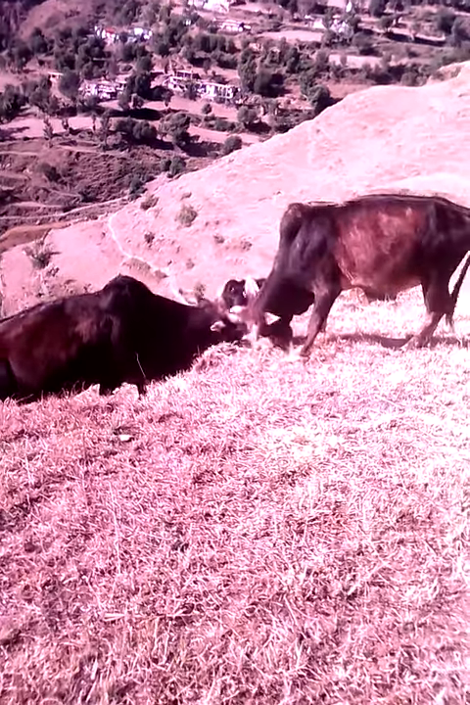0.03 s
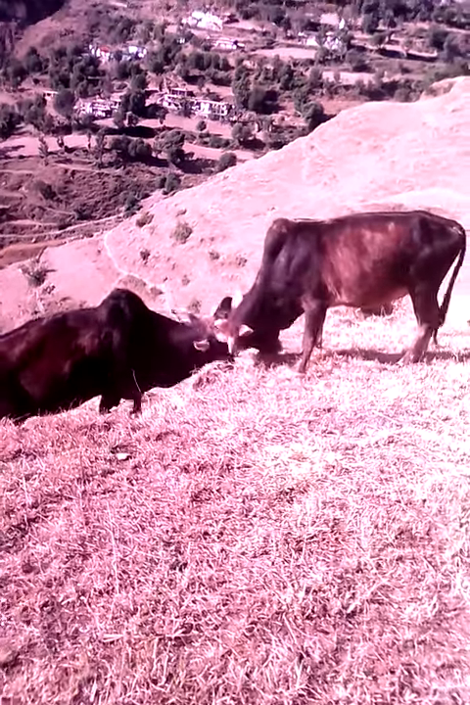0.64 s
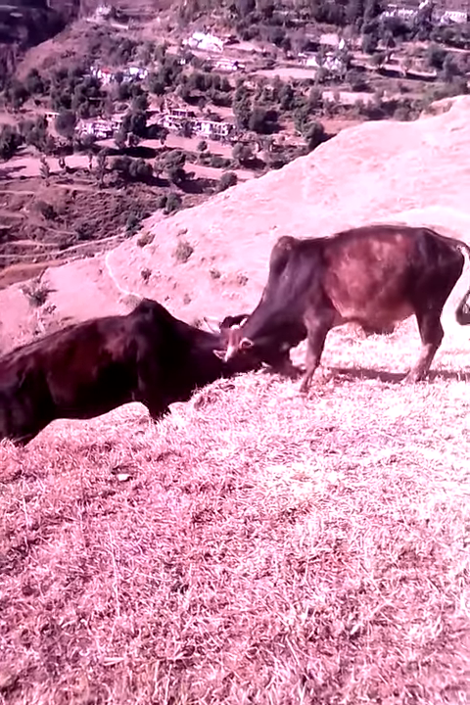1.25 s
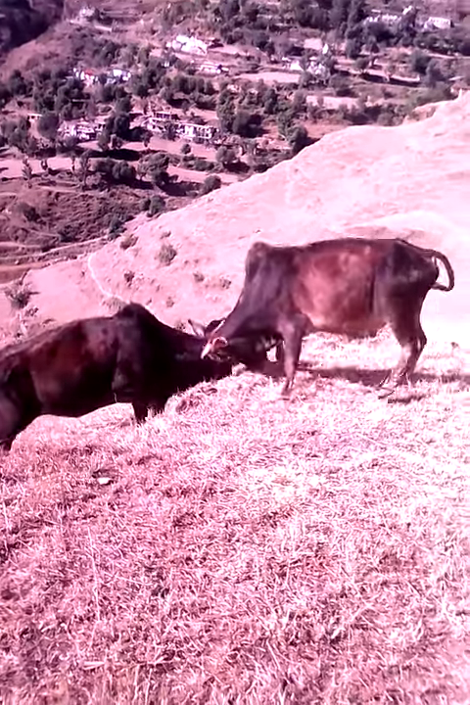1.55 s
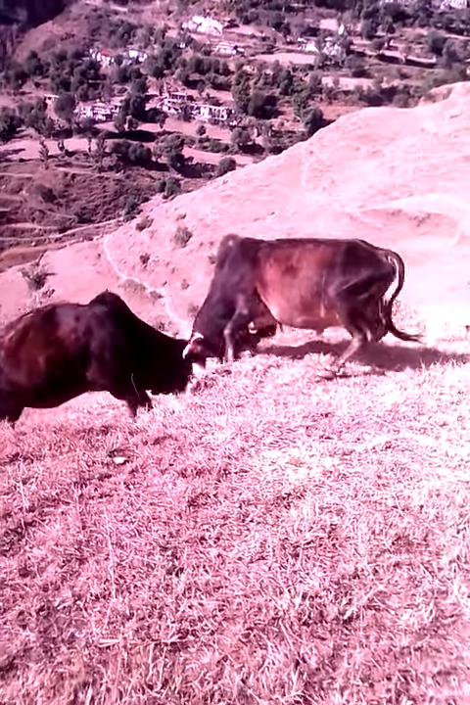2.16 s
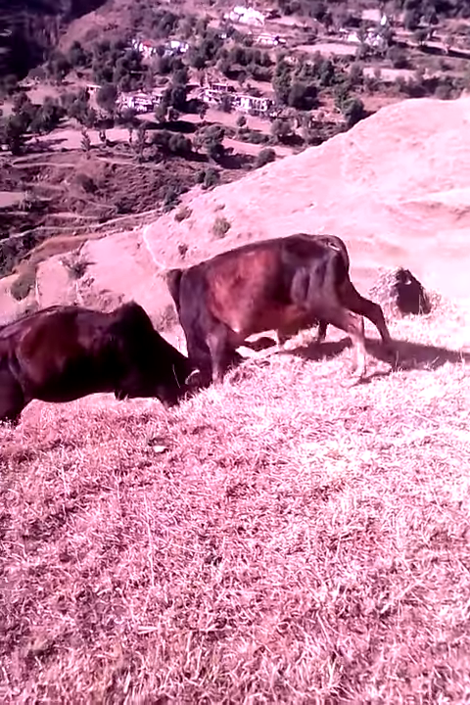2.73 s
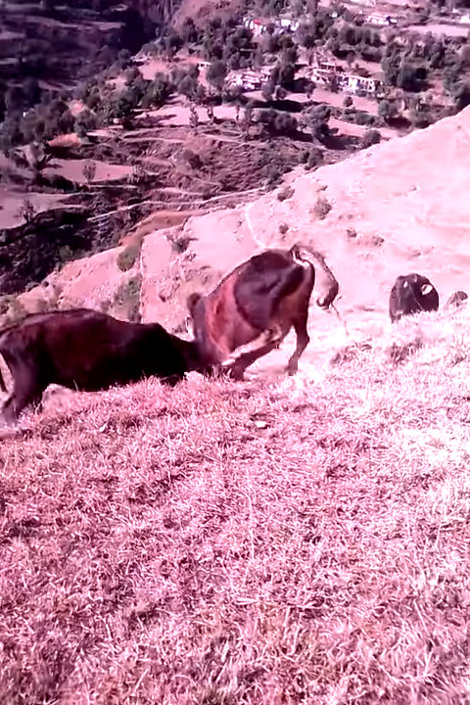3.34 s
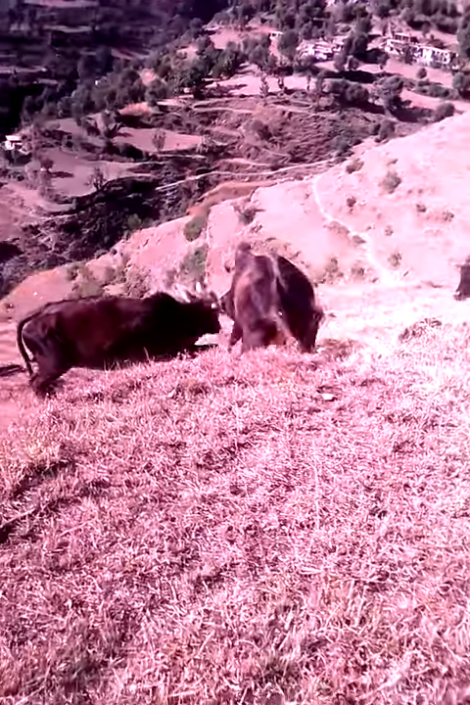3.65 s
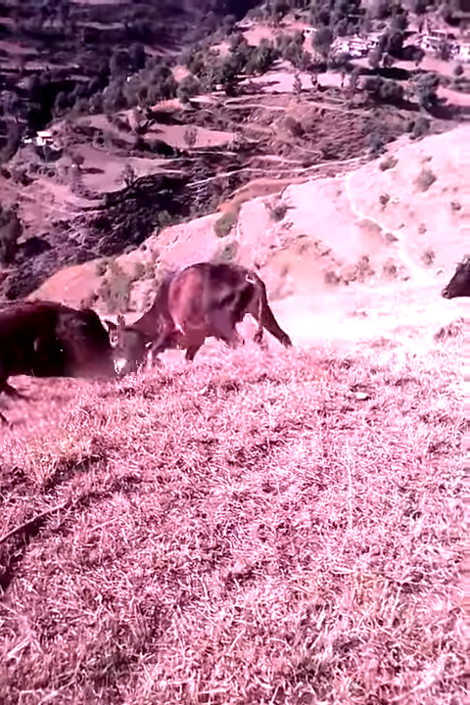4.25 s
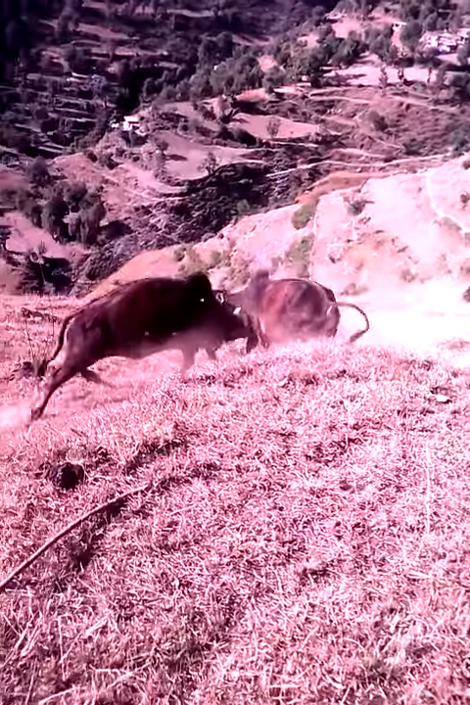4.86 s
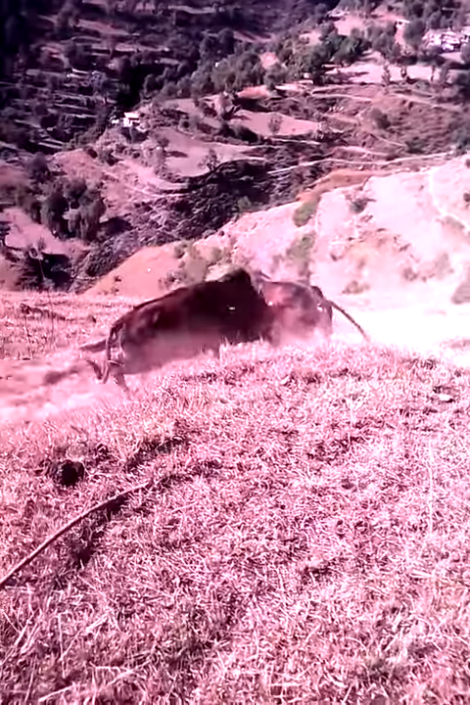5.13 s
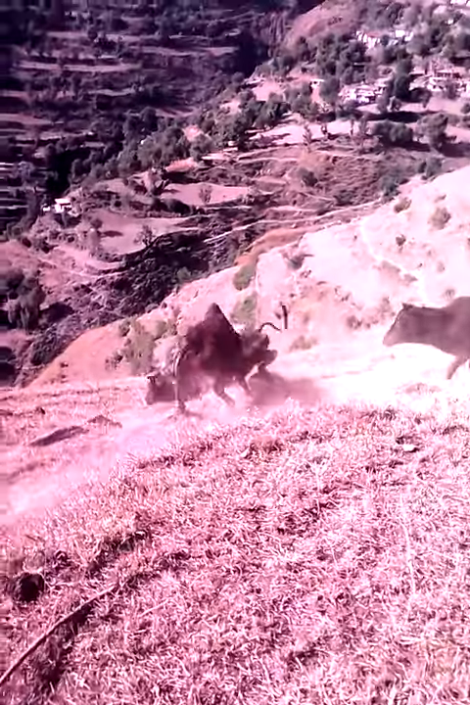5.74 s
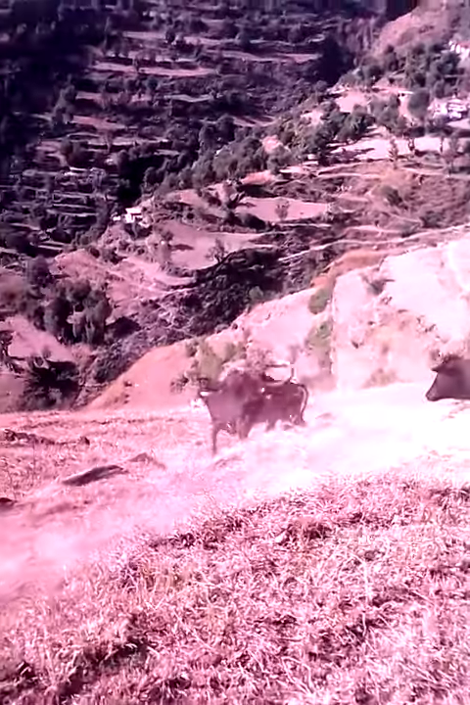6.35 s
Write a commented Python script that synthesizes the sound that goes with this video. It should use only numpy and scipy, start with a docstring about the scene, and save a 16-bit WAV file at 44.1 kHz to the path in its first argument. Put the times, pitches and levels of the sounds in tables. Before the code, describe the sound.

In faint open air, soft bumps and a brief, high grasshopper rasp lead into a scuffle between two bulls. Their hooves stamp, drag and sometimes skid on hard ground, crunching dry straw and snapping stems, mixed with hollow knocks of horn on horn and forehead. The struggle stays fairly quiet and uneven until a single sharp horn crack stands far above it, followed by a few more steps.

```python
"""Two bulls shove head to head on a dry, grassy hillside, over a faint hush of open air.
First come dull, close bumps, and a grasshopper rasps, leg on wing. From about 1.5 s hooves thud on hard
soil and scrape through the stubble while horns clack together. From about 3.6 s a hoof now and then
skids, sticking and slipping, and the grasshopper rasps once more. Just after 6 s horn hits horn
squarely, with a crack far louder than the rest."""
import sys
import numpy as np
from scipy import signal
from scipy.fft import rfft, irfft, next_fast_len
from scipy.io import wavfile
from scipy.ndimage import map_coordinates

SR = 44100
rng = np.random.default_rng(int(sys.argv[2]) if len(sys.argv) > 2 else 0)


def file_out(sig):
    """Save sig as 16-bit WAV at sys.argv[1]."""
    # one column per channel
    cols = np.atleast_2d(sig).T
    # limit, then scale
    lim = np.clip(cols, -1, 1)
    pcm = np.round(lim * 32767).astype(np.int16)
    wavfile.write(sys.argv[1], SR, pcm)


N = 286294  # about 6.5 s
TIME = np.arange(N) / SR  # seconds through the scene
HIT_TIME = np.arange(SR // 16) / SR  # seconds through one hit
TOP_HZ = 13950  # upper limit of the microphone

# Levels compare the rows of a table; the functions set the final loudness.
# tone of the open air: (frequency [Hz], level [dB])
AIR_TONE = [(25, -21), (120, -2), (300, -6), (450, -1.5), (600, -9.5), (1400, -6), (2600, -17),
            (4700, -20.5), (5200, -17), (5800, -23), (7000, -20.5), (14000, -27.5)]
# tone of the grasshopper's wing: (frequency [Hz], level [dB])
WING_TONE = [(4500, -50), (6400, 0), (8000, -18), (10800, -14), (11700, 0), (13200, -6), (14000, -13)]
# runs of grasshopper rasps: (start [s], length [s], level [dB])
RASPS = [(0.738, 0.36, -67.5), (3.86, 0.39, -68)]
# dull, close bumps: (time [s], level [dB], pitch [Hz], width [share of pitch], treble limit [Hz])
DULL_BUMPS = [(0.192, -48, 303, 0.63, 470), (0.6016, -43.5, 223, 0.58, 6000), (1.355, -44, 294, 1.25, 1850),
              (6.2224, -39, 496, 0.18, 800)]
# rustle of dry straw underfoot: (time [s], level [dB])
RUSTLE = [(0, -65.5), (.6, -67.5), (1.2, -66.5), (1.7, -64), (2.02, -62), (2.26, -62), (2.6, -64.5),
          (3.0, -62.5), (3.38, -64), (3.55, -66.5), (4.6, -65.5), (5.2, -65), (5.7, -64), (5.97, -61.5),
          (6.49, -62)]
# how hard the bulls shove, heard as shuffling: (time [s], level [dB])
EFFORT = [(0.0, -74), (0.47, -68.5), (1.43, -65.5), (1.61, -67.5), (2.86, -58), (3.29, -58), (3.36, -62.5),
          (3.83, -56), (3.94, -56.5), (4.65, -61.5), (5.19, -59.5), (5.24, -61), (5.97, -54.5), (6.34, -61),
          (6.49, -63)]
# heaves of body weight that shake the ground: (middle [s], half-width [s], level [dB])
HEAVES = [(1.45, 0.074, -70), (2.7, 0.22, -60.5), (3.45, 0.09, -56), (3.65, 0.05, -49.5),
          (3.88, 0.21, -62.5)]
# tone of the shaking ground: (frequency [Hz], level [dB])
GROUND_TONE = [(20, -33), (45, -7), (85, -7), (130, -4.5), (220, -17), (600, -53)]
# tone of shifting lumps of soil: (frequency [Hz], level [dB])
SOIL_TONE = [(25, -34), (50, -33), (110, -4), (230, 2.5), (400, 0.5), (560, -15.5), (900, -21), (2000, -84)]
# tone of grinding grit: (frequency [Hz], level [dB])
GRIT_TONE = [(250, -8), (550, 8.5), (900, 1), (1300, 0.5), (2200, -3), (3000, -15), (4500, -17),
             (9000, -57)]
# tone of crushed straw: (frequency [Hz], level [dB])
STRAW_TONE = [(1500, -7.5), (3200, 3), (4300, -1), (5200, 1.5), (6500, -3.5), (9000, -0.5), (11500, 1),
              (14000, -4)]
# legs sweeping through grass: (start [s], length [s], level [dB], pitch [Hz], width [share of pitch])
SWISHES = [(1.85, 0.085, -71, 10500, .5), (1.981, 0.24, -64.5, 10500, 0.74),
           (2.201, 0.093, -62.5, 10000, 0.67), (2.425, 0.074, -65, 6000, 1.4),
           (3.302, 0.19, -66.5, 11000, .5), (4.64, 0.097, -66, 10000, .5), (4.85, 0.087, -66.5, 4020, .25),
           (5.169, 0.057, -59.5, 3920, 0.2), (5.488, 0.16, -67.5, 4000, 0.22),
           (5.745, 0.056, -58.5, 4800, .4), (5.899, .17, -66.5, 5030, .2), (6.198, .28, -71, 5200, 0.12)]
# thick stems breaking: (time [s], level [dB], pitch [Hz])
STEM_SNAPS = [(1.359, -61, 4900), (1.4685, -47.5, 4000), (1.567, -58, 6960), (1.569, -60, 12000),
              (2.6372, -58.5, 5500), (2.7168, -57, 6950), (2.834, -50.5, 7900), (2.853, -58, 4950),
              (3.175, -55, 11000), (5.097, -60, 11000), (5.6635, -58, 10500), (5.8268, -58.5, 11100),
              (5.8547, -44.5, 4560), (5.919, -56.5, 4530), (6.129, -60, 3700), (6.2225, -55, 4500),
              (6.292, -59.5, 8500)]
# hooves dragging through stubble: (start [s], length [s], level [dB], grit pitch [Hz])
SCRAPES = [(0.602, 0.049, -71, 1240), (1.058, .04, -62, 950), (1.629, 0.094, -63, 1600),
           (2.015, 0.026, -50.5, 1150), (2.047, 0.075, -60, 1100), (2.22, 0.032, -59, 1000),
           (2.337, 0.039, -57, 1350), (2.424, 0.071, -54, 1210), (2.688, 0.052, -55, 1400),
           (2.818, 0.042, -50.5, 1150), (2.992, 0.11, -55, 1110), (3.302, 0.16, -60.5, 1300),
           (3.861, 0.14, -59.5, 1100), (4.05, .11, -62.5, 996), (4.179, 0.03, -63, 1400),
           (4.283, 0.087, -58.5, 1190), (4.735, 0.061, -60.5, 1130), (4.858, 0.043, -53.5, 950),
           (5.099, 0.059, -58, 1100), (5.167, 0.045, -55.5, 900), (5.498, 0.17, -59.5, 1840),
           (5.952, 0.1, -57, 780)]
# hooves skidding: (start [s], length [s], level [dB], slip rate [1/s], pitch [Hz])
SKIDS = [(3.585, 0.066, -51.5, 121, 256), (4.875, 0.031, -53.5, 168, 265),
         (5.532, 0.049, -55.5, 140, 243.8)]
# hooves landing: (time [s], thud level [dB], thud pitch [Hz], clack level [dB], rough clack pitch [Hz])
FOOTFALLS = [(1.4537, -54.5, 227, -52.5, 885), (1.567, -46, 179, -44, 1360),
             (1.7352, -50, 208, -50.5, 1350), (2.0126, -46.5, 387, -46.5, 1490),
             (2.0154, -44.5, 314, -44.5, 1580), (2.034, -45.5, 137, -58, 1540),
             (2.2407, -49, 210, -57, 1760), (2.253, -50, 192, -61, 1830), (2.47, -55.5, 294, -52.5, 1420),
             (2.486, -51.5, 424, -51, 920), (2.541, -57, 240, -60, 1820), (2.557, -56, 170, -59, 1180),
             (2.613, -56, 304, -56.5, 1180), (2.705, -48, 298, -51.5, 1450),
             (2.733, -48.5, 282, -48.5, 1440), (2.832, -43, 363, -56, 1660),
             (2.8494, -47.5, 370, -48, 1890), (3.0187, -48.5, 350, -66, 1190),
             (3.124, -50, 315, -49.5, 1360), (3.1732, -43, 356, -49, 1320),
             (3.175, -42.5, 196, -42.5, 1430), (3.322, -49, 390, -50.5, 1160),
             (3.331, -49.5, 290, -59, 1120), (3.353, -56, 280, -56, 1290), (3.42, -41.5, 242, -62, 1230),
             (3.458, -55, 260, -58, 1150), (3.525, -57.5, 240, -75, 1100), (3.6275, -44, 101, -55, 1300),
             (3.665, -44.5, 232, -47.5, 1160), (3.671, -42.5, 177, -43, 1180), (3.723, -53, 260, -60, 1460),
             (3.7574, -47.5, 340, -47.5, 1470), (3.796, -51, 300, -57, 1520),
             (3.813, -45.5, 296, -40, 1350), (3.831, -50, 300, -60, 1250), (3.952, -42.5, 244, -60, 1390),
             (3.991, -49, 130, -51, 1470), (4.038, -59, 296, -55.5, 1300), (4.178, -53.5, 335, -53.5, 1350),
             (4.201, -53, 356, -56, 1340), (4.427, -55, 363, -55, 1040), (4.455, -55, 287, -64, 1370),
             (4.515, -53, 260, -64, 1370), (4.5544, -53, 244, -59.5, 1230), (4.613, -57.5, 268, -69, 1360),
             (4.763, -46.5, 238, -48.5, 1350), (4.778, -47.5, 306, -55.5, 1300),
             (4.9105, -46.5, 377, -44, 1100), (5.013, -46, 234, -63, 1220), (5.0718, -45.5, 220, -62, 1210),
             (5.176, -45, 320, -53, 1100), (5.188, -45, 161, -49, 1000), (5.207, -51, 302, -53, 1420),
             (5.3425, -44.5, 269, -57, 1080), (5.367, -41, 344, -48.5, 1000), (5.382, -47, 240, -61, 1270),
             (5.4207, -47.5, 135, -50.5, 877), (5.503, -53, 288, -53.5, 1370),
             (5.5555, -51, 269.5, -52, 1750), (5.703, -53, 270, -75, 1330), (5.7567, -44, 322, -47.5, 1420),
             (5.829, -42.5, 189, -46.5, 830), (5.8372, -45, 310, -43, 960), (5.85, -42.5, 357, -45.5, 1290),
             (5.909, -48.5, 251, -43, 1210), (5.926, -50, 250, -64, 1020), (6.0346, -43, 236, -57, 1000),
             (6.159, -52.5, 170, -64, 1180), (6.2191, -49.5, 288, -49.5, 730),
             (6.3137, -51.5, 320, -50.5, 834), (6.3477, -49, 221, -60, 820), (6.388, -55, 334, -60, 690),
             (6.425, -54.5, 230, -63, 1730)]
# horn base hitting forehead: (time [s], level [dB], horn pitch [Hz], treble limit [Hz])
BUTTS = [(1.0483, -39, 1230, 2300), (3.1735, -43, 1700, 3200), (5.663, -36, 1500, 7000)]
# notes a skull rings with: (frequency [Hz], level [dB], time to fade by 60 dB [s])
SKULL_NOTES = [(345, -17, .02), (910, -6.5, 0.012), (2190, -10.5, 0.01), (3000, -16, .006),
               (4050, -5.5, 0.0024), (8400, -17, .002)]
# horn tips touching: (time [s], level [dB])
TIP_CLICKS = [(1.3007, -49), (5.778, -45.5)]
# notes a horn tip rings with: (frequency [Hz], level [dB], time to fade by 60 dB [s])
TIP_NOTES = [(2040, 1, 0.0083), (3800, -2.5, 0.0064), (6100, -8.5, 0.0034), (8330, -3.5, 0.006),
             (13100, -11, .003)]
# horn knocking on horn: (time [s], level [dB], rough pitch [Hz], offset for the bright snap [dB])
HORN_KNOCKS = [(1.497, -52.5, 1530, -26), (1.563, -50, 1230, -3), (1.778, -57, 1470, -28),
               (1.8252, -52, 1440, -7.5), (1.8768, -48, 1490, -10.5), (1.906, -56.5, 1460, -7),
               (1.9519, -52.5, 1320, -3), (2.064, -45, 1420, -18), (2.375, -55, 1920, -19),
               (2.5049, -50, 1550, -10), (2.57, -54, 1850, -18), (2.6374, -52, 1250, -8.5),
               (2.716, -47.5, 1730, -7.5), (2.796, -47, 1090, -13.5), (2.832, -41.5, 1400, -5),
               (2.913, -51, 1900, -12), (2.9225, -49, 1270, -16), (2.9642, -52.5, 1200, -9.5),
               (3.0456, -48.5, 1230, -14), (3.153, -50.5, 1310, -21), (3.3748, -43.5, 1590, -18),
               (4.348, -45.5, 1300, -18.5), (5.192, -41.5, 1540, -19), (5.8505, -39.5, 1530, -15),
               (6.0203, -58.5, 1900, 3), (6.2216, -51, 2100, -14)]
# notes a hard-struck horn rings with: (frequency [Hz], level [dB], time to fade by 60 dB [s])
HORN_NOTES = [(760, -19, 0.0069), (1610, -9, 0.011), (1776, -45, 0.13), (1930, -11.5, 0.0066),
              (2330, -6, 0.0038), (4130, -6.5, 0.0023), (5300, -10, 0.0017), (8330, -8.5, 0.0046),
              (10700, -14, 0.002), (12460, -11.5, 0.0029)]
# the one hard horn strike: (time [s], level [dB], skull thump level [dB], thump pitch [Hz])
HARD_STRIKE = (6.0904, -3, -38.5, 314)


def amp(db):
    """Turn decibels into a number to multiply by."""
    return 10 ** (np.asarray(db) / 20)


def unit(x):
    """Scale a sound to an average power of 1."""
    return x / np.sqrt(np.mean(x ** 2) + 1e-20)


def burst(x):
    """Scale a short sound to the energy of 10 ms at power 1."""
    return x * np.sqrt(SR / 100 / (np.sum(x ** 2) + 1e-20))


def add(track, s, sound):
    """Mix a sound into the track at s seconds."""
    i = max(round(s * SR), 0)
    track[i:i + len(sound)] += sound[:max(len(track) - i, 0)]


def level(curve, s):
    """Read a level curve at s seconds."""
    return np.interp(s, *np.transpose(curve))


def band(x, low_hz, high_hz, order):
    """Keep what lies between two frequencies; a higher order cuts more sharply."""
    edges = np.clip([low_hz, max(high_hz, low_hz * 1.1)], 10, SR / 2 - 100)
    return signal.sosfilt(signal.butter(order, edges, "band", fs=SR, output="sos"), x)


def coloured(x, tone):
    """Shape a sound with a tone table, then scale it to power 1."""
    hz, db = np.transpose(tone)
    size = next_fast_len(N + 8192)
    log_hz = np.log(np.fft.rfftfreq(size, 1 / SR) + 1)
    gain = amp(np.interp(log_hz, np.log(hz), db))
    return unit(irfft(rfft(x, size) * gain, size)[:N])


def wobble(rate):
    """A smooth curve through random values, rate of them a second."""
    values = rng.standard_normal(int(N * rate / SR) + 4)
    return map_coordinates(values, [np.arange(N) * rate / SR])


def crunch(rate, spread_db, size=N):
    """Tiny clicks of uneven strength at random moments, about rate a second."""
    chance = rng.random(size) * SR / rate
    at = np.flatnonzero(chance < 1)
    out = np.zeros(size)
    out[at] = amp(-spread_db * np.log(chance[at] + .03)) * (-1) ** at
    return unit(out)


def resonate(x, hz, width):
    """Make a sound ring near hz; a smaller width (a share of hz) rings longer."""
    angle = 2 * np.pi * min(hz, TOP_HZ) / SR
    loss = np.sin(angle) * width / 2
    return burst(signal.lfilter([loss, 0, -loss], [1 + loss, -2 * np.cos(angle), 1 - loss], x))


def hollow(push, hz, scatter, width):
    """Three narrow rings near hz, different for every point of contact."""
    pitches = hz * np.exp(rng.uniform(-scatter, scatter, 3))
    return burst(sum(resonate(push, pitch, width) for pitch in pitches))


def ringing(notes, t=HIT_TIME):
    """A struck object sounds several notes at once, each fading at its own speed."""
    return sum(amp(db - 60 * t / fade_s) * np.sin(2 * np.pi * hz * t) for hz, db, fade_s in notes)


def thump(hz, damping):
    """Something heavy gives way and springs back for a swing or two."""
    cycles = hz * HIT_TIME
    return burst(np.sin(2 * np.pi * cycles) * cycles * np.exp(-damping * cycles))


def contacts(chatter_s):
    """Hard surfaces meet, chatter four times and rub for a moment."""
    push = amp(-13) * rng.standard_normal(len(HIT_TIME)) * np.exp(-HIT_TIME / (chatter_s + 0.0017))
    push[0] += 1
    for when, strength in zip(rng.random(4), rng.normal(0, 0.72, 4)):
        add(push, when * chatter_s, np.array([strength]))
    return push


def clacks(hits, lead_in_db, ring_share, ring_scatter, ring_width):
    """Each hit briefly rings a horn or hoof; sharp edges add a snap."""
    body, snap = np.zeros(N), np.zeros(N)
    lead = SR // 200  # a faint noise swells for 5 ms before each clack, softening its start
    lead_in = amp(lead_in_db) * np.linspace(0, 1, lead) ** 3
    trickle = amp(-33 - 60 * HIT_TIME / 0.098)  # loose grit falls afterwards
    for s, db, hz, snap_db, chatter_s in hits:
        push = np.concatenate([lead_in, trickle]) * rng.standard_normal(lead + len(HIT_TIME))
        push[lead:] += contacts(chatter_s)
        ring = resonate(push, hz * 1.02, width=0.83)
        ring += ring_share * hollow(push, hz * 0.988, ring_scatter, ring_width)
        ring = resonate(ring, hz * 0.56, width=1.24)  # the soft contact dulls the highs
        edge = resonate(push, 3220, width=0.66) + 0.087 * hollow(push, 3930, scatter=0.42, width=0.032)
        add(body, s - lead / SR, amp(db) * ring)
        add(snap, s - lead / SR, amp(db + snap_db) * burst(edge))
    return amp(0.14) * band(body, 480, 3100, order=3) + amp(2.8) * band(snap, 3400, 22000, order=2)


def hollow_colour(x, delay_s=.00096, share=.55):
    """Adding a copy delayed by about 1 ms gives a hollow tone."""
    late = np.interp(TIME - delay_s, TIME, x)
    return (x + share * late) / np.hypot(1, share)


def open_air():
    """The faint, steady hush of the hillside."""
    return amp(-64.5) * coloured(rng.standard_normal(N), AIR_TONE)


def grasshopper(rasps_per_s=21.8):
    """A leg strokes a wing in short runs of thin, high rasps."""
    loudness = np.zeros(N)
    for s, length, db in RASPS:
        swell = np.abs(np.sin(np.pi * np.clip((TIME - s) / length, 0, 1))) ** .5
        loudness += amp(db) * swell * np.cos(np.pi * rasps_per_s * (TIME - s)) ** 2
    return loudness * coloured(rng.standard_normal(N), WING_TONE)


def dull_bumps():
    """Dull, close bumps and hollow knocks, some with a click."""
    out, tap = np.zeros(N), signal.unit_impulse(len(HIT_TIME))
    for s, db, hz, width, treble_hz in DULL_BUMPS:
        add(out, s, amp(db) * burst(band(resonate(tap, hz, width), 45, treble_hz, order=2)))
    return out


def stalks():
    """Single dry stalks break, louder where the rustle is thick."""
    rustle_db = level(RUSTLE, TIME)
    db = rustle_db.mean() - 14 + 2 * (rustle_db - rustle_db.mean())
    cracks = resonate(crunch(rate=19, spread_db=3.5), 9300, width=3.3)
    return amp(db) * unit(band(cracks, 2000, 17000, order=1))


def scuffing():
    """Shuffling feet shake the ground, shift soil, grind grit and crush dry straw."""
    effort_db = level(EFFORT, TIME)
    grit_db = effort_db.mean() - 8 + 0.79 * (effort_db - effort_db.mean())
    heaves = sum(amp(db) * np.exp(-((TIME - s) / width) ** 2) for s, width, db in HEAVES)
    jerk = wobble(45)  # soil, grit and straw flicker together
    tremor = (amp(effort_db - 14) + heaves) * coloured(crunch(740, spread_db=3), GROUND_TONE)
    soil = amp(effort_db - 2 + 4.55 * jerk) * coloured(crunch(700, spread_db=4), SOIL_TONE)
    grit = amp(grit_db + 4 * jerk) * hollow_colour(coloured(crunch(600, spread_db=2), GRIT_TONE))
    straw_db = level(RUSTLE, TIME) - 2.5 + jerk + 1.5 * wobble(14)
    straw = amp(straw_db) * coloured(crunch(7000, spread_db=4), STRAW_TONE)
    return tremor + soil + grit + straw


def swishes():
    """Legs sweep through standing grass: tiny crackles rise quickly and fall more slowly."""
    out = np.zeros(N)
    for s, length, db, hz, width in SWISHES:
        progress = np.linspace(0, 1, round(length * SR))
        sweep = np.abs(np.sin(np.pi * progress ** 0.62))
        blades = resonate(crunch(2500, spread_db=5, size=len(progress)), hz, width)
        add(out, s, amp(db) * sweep * unit(band(blades, 2800, 13000, order=3)))
    return out


def stem_snaps():
    """A thick stem breaks under a hoof with one crisp crack and a very short ring."""
    out, crack = np.zeros(N), signal.unit_impulse(len(HIT_TIME))
    for s, db, hz in STEM_SNAPS:
        ring = resonate(crack, hz, width=1.5) + resonate(crack, hz, width=0.14)
        add(out, s, amp(db) * burst(band(ring, 1400, 15000, order=2)))
    return out


def scrapes(slide_s=0.053):
    """A dragged hoof rolls grit over hard soil and snaps straw; every footfall slides a little too."""
    grit, straw, t = np.zeros(N), np.zeros(N), np.arange(SR // 5) / SR
    slides = [(s, slide_s, clack_db - 27.5, hz) for s, _, _, clack_db, hz in FOOTFALLS]
    for s, length, db, hz in SCRAPES + slides:
        stroke = np.abs(np.sin(np.pi * np.clip(t / (length + 0.011), 0, 1))) ** 0.35
        rolling = unit(resonate(crunch(650, spread_db=4, size=len(t)), hz, width=0.52))
        add(grit, s - .005, amp(db) * stroke * rolling)
        add(straw, s - .005, amp(db - 14) * stroke * crunch(2000, spread_db=6, size=len(t)))
    return amp(0.4) * band(grit, 520, 3500, order=3) + amp(3.5) * band(straw, 1800, 10000, order=1)


def skids():
    """A hoof under weight sticks and slips; every slip thumps the soil and grinds some grit."""
    out, grit_fade = np.zeros(N), amp(-60 * HIT_TIME / 0.025)
    for s, length, db, rate, hz in SKIDS:
        for t in np.arange(0, length, 1 / rate):
            swell = 1.77 + 0.52 * np.sin(np.pi * t / length)
            grit = burst(band(rng.standard_normal(len(HIT_TIME)) * grit_fade, 680, 1080, order=3))
            slip = thump(hz * np.exp(rng.normal(0, 0.16)), damping=2.14) + amp(-14.5) * grit
            add(out, s + t + rng.normal(0, 0.00052), amp(db + rng.normal(0, 1)) * swell * slip)
    return out


def hoof_thuds(toe_delay_s=0.01687):
    """The weight lands on hard soil, heel then toe; the harder the shove, the more the soil shudders."""
    hits, shudders = np.zeros(N), np.zeros(N)
    swell = (1 - np.exp(-HIT_TIME / 0.011)) * amp(-60 * HIT_TIME / 0.041)
    for s, db, hz, _, _ in FOOTFALLS:
        load_db = db + min(0.46 * (level(EFFORT, s) + 60), 0)
        add(hits, s, amp(db) * thump(hz, damping=1.9))
        toe = amp(load_db - 13) * thump(hz * 0.77, damping=1.9)
        add(hits, s + toe_delay_s * rng.uniform(0.75, 1.206), toe)
        shudder = resonate(swell * rng.standard_normal(len(HIT_TIME)), hz * 0.5, width=3.8)
        add(shudders, s + 0.00283, amp(load_db) * shudder)
    return amp(1.7) * hits + amp(-6) * band(shudders, 60, 550, order=2)


def hoof_clacks():
    """The hard wall of a hoof strikes the grit, with more snap where the straw is thick."""
    s, _, _, db, hz = np.transpose(FOOTFALLS)
    straw_db = level(RUSTLE, s)
    snap_db = -19 + 2.1 * (straw_db - straw_db.mean())
    chatter_s = np.full(len(s), 0.0032)
    hits = zip(s, db, hz, snap_db, chatter_s)
    return clacks(hits, lead_in_db=-8.5, ring_share=0.41, ring_scatter=0.3, ring_width=0.16)


def butts(horn_fade_s=0.011):
    """The base of a horn lands on a forehead; both ring in one clean, hollow knock."""
    out = np.zeros(N)
    for s, db, horn_hz, treble_hz in BUTTS:
        ring = ringing(SKULL_NOTES + [(horn_hz, 0, horn_fade_s)])
        add(out, s, amp(db) * burst(band(ring, 190, treble_hz, order=2)))
    return out


def tip_clicks():
    """Horn tips touch with a thin, bright tick, a little different each time."""
    out = np.zeros(N)
    for s, level_db in TIP_CLICKS:
        ring = ringing([(hz, db + rng.normal(0, 0.69), fade_s) for hz, db, fade_s in TIP_NOTES])
        add(out, s, amp(level_db) * burst(band(ring, 900, 20000, order=2)))
    return out


def skull_thumps():
    """Every horn knock also shakes the heavy skull behind it."""
    out = np.zeros(N)
    for s, db, _, _ in HORN_KNOCKS:
        add(out, s + 0.0011, amp(db - 8.5) * thump(hz=366, damping=3.5))
    return out


def horn_knocks():
    """Horns clack together; the louder the knock, the shorter its chatter."""
    s, db, hz, snap_db = np.transpose(HORN_KNOCKS)
    chatter_s = .0007 * np.exp(-0.03 * (db - db.mean()))
    hits = zip(s, db, hz, snap_db, chatter_s)
    return clacks(hits, lead_in_db=-17, ring_share=1.5, ring_scatter=0.099, ring_width=0.11)


def hard_strike():
    """Horn hits horn squarely: a dry crack, a dull thump and a faint lingering ring."""
    s, level_db, skull_db, skull_hz = HARD_STRIKE
    out, t = np.zeros(N), np.arange(SR // 5) / SR
    ring = band(ringing(HORN_NOTES, t), 880, 22000, order=2)  # a small object gives off little bass
    noise = unit(band(rng.standard_normal(len(t)), 300, 2600, order=2))
    ground_echo = noise * amp(-30 - 60 * t / 0.028)
    add(out, s, amp(level_db) * (ring + ground_echo))
    add(out, s + 0.00069, amp(skull_db) * thump(skull_hz, damping=2.4))  # the heavy skull answers later
    return out


def scene():
    """Mix the air, the fight, the bumps and the grasshopper into one channel."""
    air = open_air()
    horns = horn_knocks() + skull_thumps() + butts() + tip_clicks() + hard_strike()
    hooves = hollow_colour(hoof_clacks() + scrapes())
    ground = hoof_thuds() + skids() + scuffing() + swishes() + stalks() + stem_snaps()
    return (horns + hooves + ground + dull_bumps() + grasshopper() + air)[None]


def record(dry):
    """A tiny microphone loses the deepest bass and the highest treble."""
    size = next_fast_len(N + 8192)
    hz = np.fft.rfftfreq(size, 1 / SR)
    bass_cut = 1j * hz / (25 + 1j * hz)
    treble_cut = 1 / np.sqrt(1 + (hz / TOP_HZ) ** 240)
    return irfft(rfft(dry, size) * bass_cut * treble_cut, size)[..., :N]


dry = scene()
out = record(dry)
file_out(out)
```